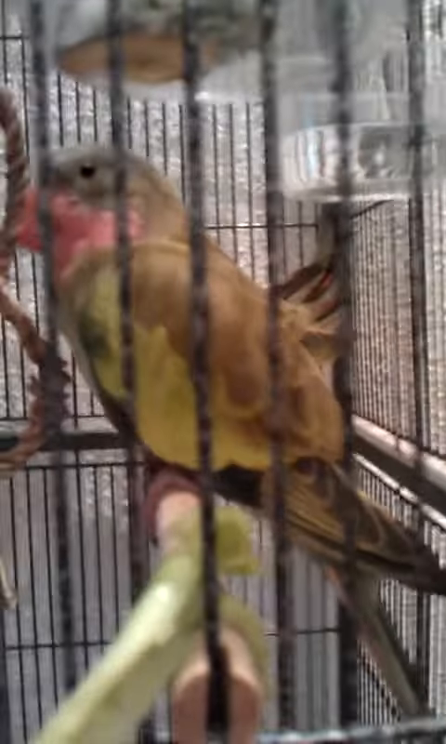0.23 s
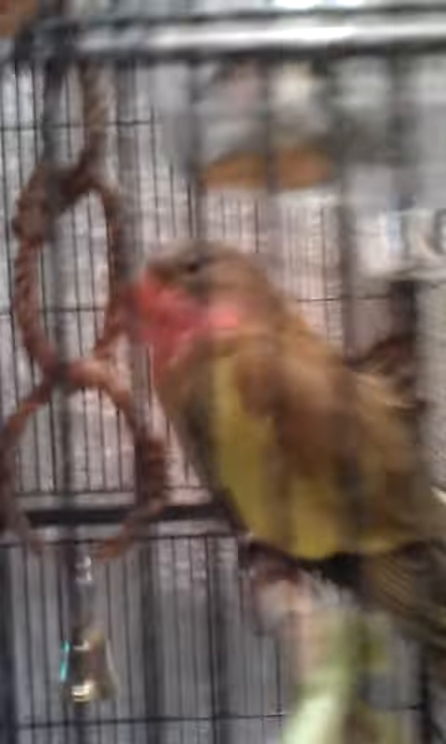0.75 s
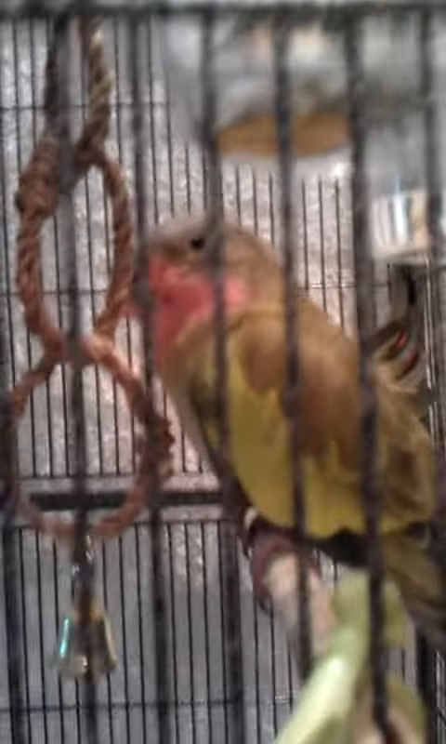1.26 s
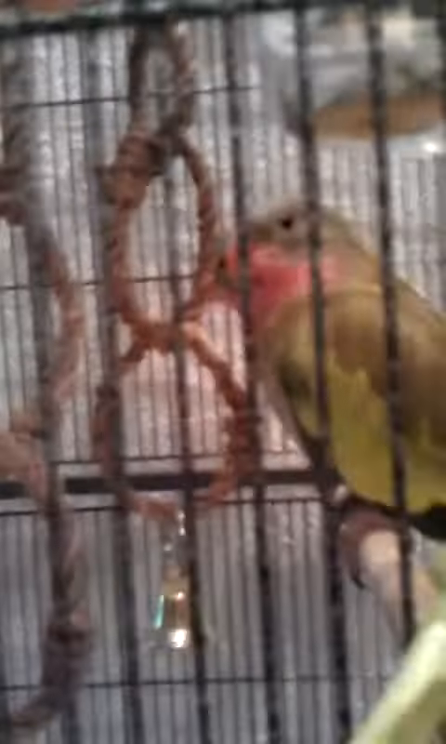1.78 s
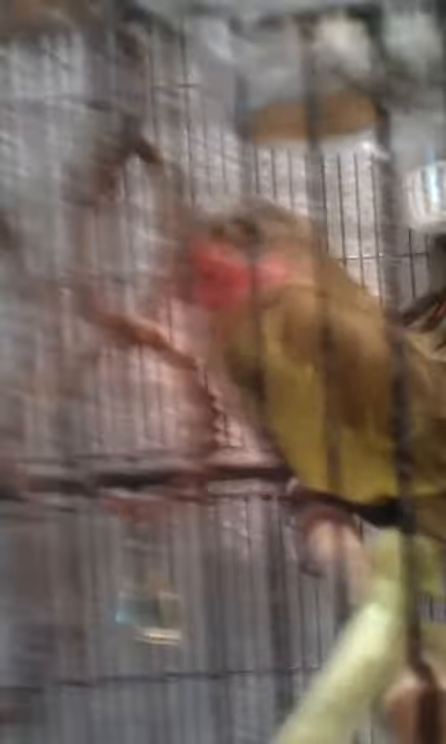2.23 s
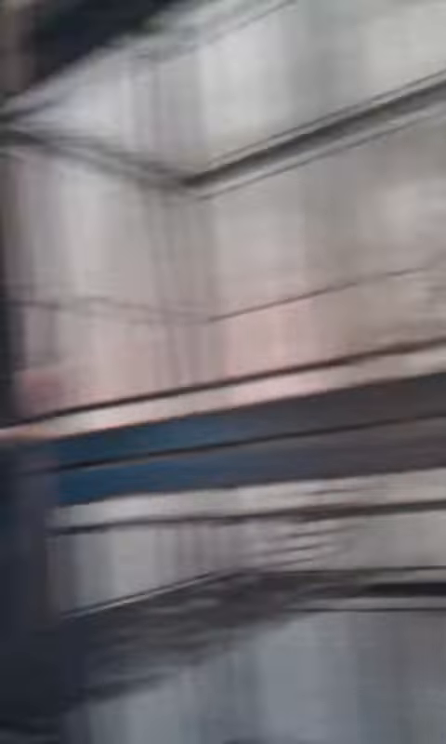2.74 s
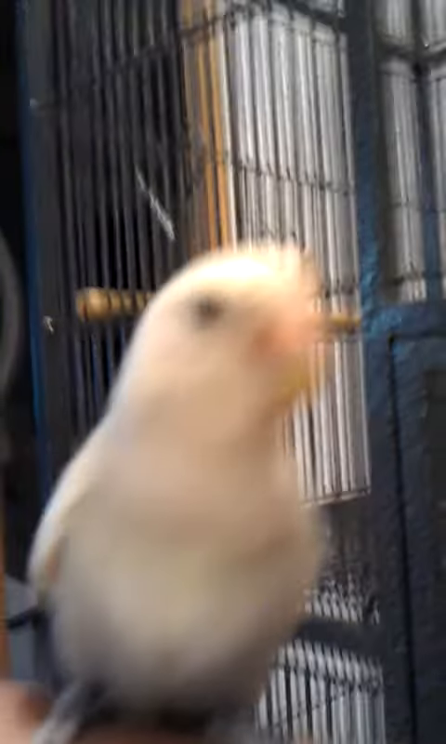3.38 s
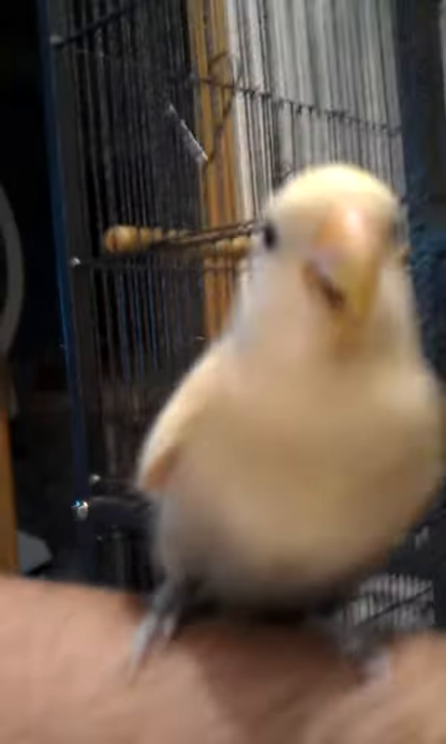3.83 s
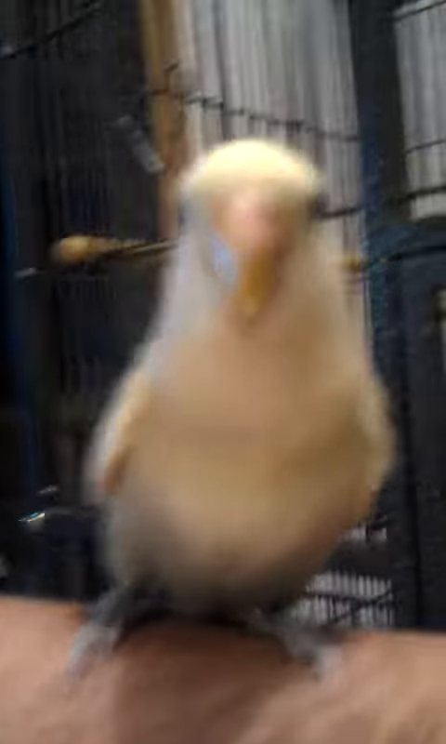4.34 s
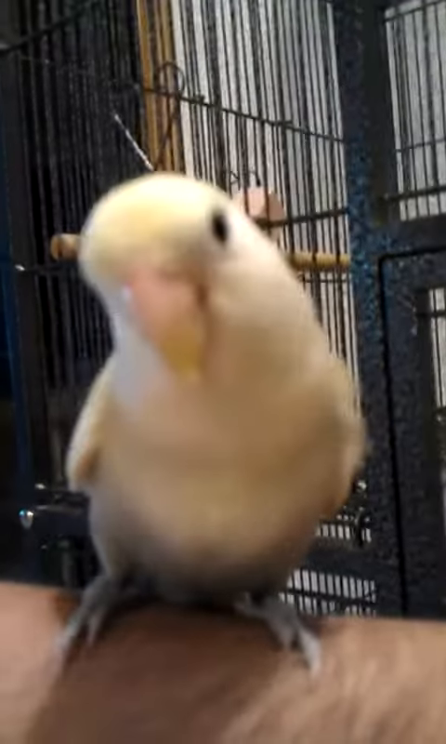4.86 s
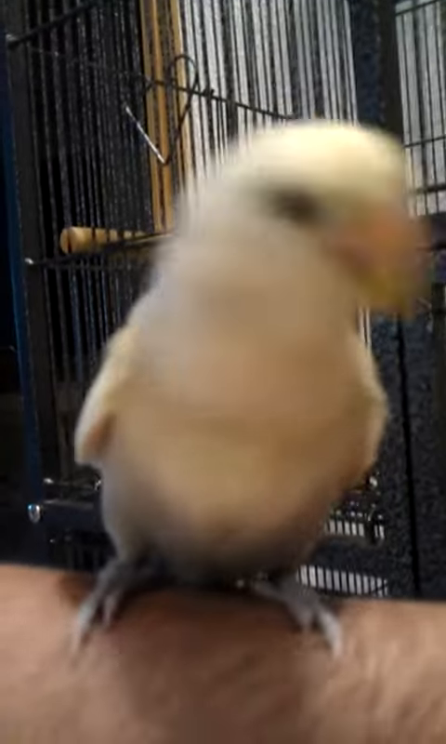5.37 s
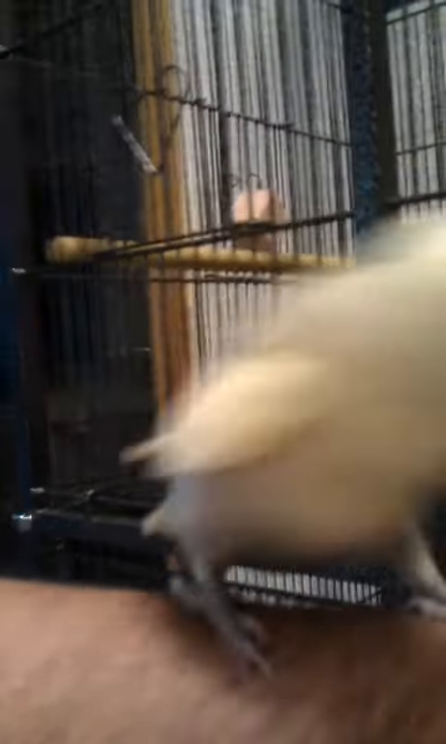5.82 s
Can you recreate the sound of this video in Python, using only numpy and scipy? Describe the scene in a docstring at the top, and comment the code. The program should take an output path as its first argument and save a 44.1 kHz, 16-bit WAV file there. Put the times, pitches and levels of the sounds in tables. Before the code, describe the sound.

Two loud, raspy lovebird screeches ring through a hard-walled room, with softer chirping and chatter from more distant birds.

```python
"""Lovebirds in a hard-walled room

One bird screeches twice right beside the microphone, which overloads while its gain control
clamps down and lets the room's ring swell up. Each screech is a run of joined notes, leaping
between a low and a high register and breaking into rasp. Other birds chirp and chatter farther
off, heard as reverberation over faint air noise and mains hum."""
import sys
import numpy as np
from scipy import signal
from scipy.fft import rfft, irfft, next_fast_len
from scipy.io import wavfile
from scipy.ndimage import uniform_filter1d

SR = 44100
rng = np.random.default_rng(int(sys.argv[2]) if len(sys.argv) > 2 else 0)


def wav_record(signal):
    """Record a signal, one row per channel, as 16-bit PCM in the file named by sys.argv[1]."""
    frames = np.transpose(np.atleast_2d(signal))
    bounded = np.clip(frames, -1, 1)
    # unit amplitude maps onto the largest positive 16-bit level
    quanta = np.round(bounded * 32767).astype(np.int16)
    wavfile.write(sys.argv[1], SR, quanta)


N = 269010
BAND_LIMIT_HZ = 15850

# The throat's resonances, as an EQ on the tone: frequency_hz, gain_db
THROAT_EQ = [(1200, -45.5), (1800, -13), (2100, -14.5), (2350, -18), (2650, -17), (2950, -18.5),
             (3250, -11.5), (3550, -28.5), (4050, -5), (4800, -6.5), (5400, -6.5), (6600, -1), (7150, -1),
             (7900, -32.5), (8550, -17.5), (9800, -16.5), (10600, -46), (12400, -30), (13500, -61.5)]
# The colour of the rasp: frequency_hz, gain_db
RASP_EQ = [(2300, -47.5), (2620, -15), (3300, -6.5), (4100, -3.5), (4800, -1.5), (6500, -1), (7800, -1),
           (9900, -11.5), (10600, -44)]
# The near bird's phrases, one list a screech, one row a note held until the next:
# start_s, opening_pitch_hz, held_pitch_hz, closing_pitch_hz, effort_db, roughness (0-1)
SCREECH_NOTES = [
    [(1.0300, 1952, 2134, 2359, 2.5, 0.18), (1.037, 2400, 2480, 2599, 5.5, 0.14),
     (1.0445, 3328, 3037, 2204, 3.5, 0.39), (1.049, 3094, 2840, 2573, 1, 0.42),
     (1.056, 2994, 3234, 3300, 6, 0.18), (1.0875, 4260, 4650, 5088, 9, 0.24),
     (1.092, 3294, 3565, 3436, 10, .12), (1.109, 2964, 3330, 3019, 5.5, 0.22),
     (1.1205, 4520, 4138, 3917, 8.5, 0.17), (1.137, 3816, 4000, 4114, 14, 0.08),
     (1.153, 4044, 4250, 4303, 9.5, .07), (1.174, 4240, 4400, 3950, 5, 0.13)],
    [(3.8245, 1689, 1792, 2134, -2.5, 0.06), (3.832, 2205, 3222, 3286, 5.5, 0.14),
     (3.868, 3259, 3380, 3882, 10.5, 0.13), (3.886, 5150, 5185, 4968, 13.5, .15),
     (3.897, 3503, 2653, 2616, -5, 0.47), (3.924, 2605, 3300, 3535, 6, 0.16),
     (3.9505, 4672, 4780, 4872, 15, 0.2), (3.962, 3380, 2714, 2793, -0.5, 0.22),
     (3.974, 2814, 2702, 2600, -1, 0.44)],
]
# Where each screech stops: end_s
SCREECH_ENDS_S = [1.201, 3.998]


def screech(notes, end_s):
    """The syrinx's harmonics ring through the throat; rough cycles lose their timing and turn to rasp."""
    t, pitch_hz, effort_db, roughness = screech_gesture(notes, end_s)
    jitter = 0.008 * wobble(len(t), rate_hz=300) + 0.12 * roughness * wobble(len(t), rate_hz=900)
    cycles = np.cumsum(pitch_hz * (1 + jitter)) / SR
    harmonics = sum(np.cos(2 * np.pi * k * cycles) * (k * pitch_hz < BAND_LIMIT_HZ) for k in range(1, 8))
    tone = coloured(harmonics, THROAT_EQ)
    rasp = coloured(rng.standard_normal(SR), RASP_EQ)[:len(t)]
    voice = np.sqrt(2 * (1 - roughness ** 2)) * tone + 5.4 * roughness ** 1.5 * rasp
    return t[0], gain_of(effort_db) * voice


def screech_gesture(notes, end_s):
    """The bird's phrasing: each note slides onto its pitch, holds it and flicks off into the next."""
    settle_s, flick_s, flutter_hz = 0.0055, 0.0028, 230.8
    onset_db, attack_s, release_db, release_s = -41.5, 0.0036, -14.5, 0.022
    start_s, opening_hz, held_hz, closing_hz, note_db, note_roughness = np.transpose(notes)
    t = np.arange(start_s[0], end_s, 1 / SR)
    note = np.searchsorted(start_s, t, "right") - 1
    since_s = t - start_s[note]
    until_s = np.append(start_s[1:], end_s)[note] - t
    slide_hz = (opening_hz - held_hz)[note] * np.exp(-since_s / settle_s)
    flick_hz = (closing_hz - held_hz)[note] * np.exp(-until_s / flick_s)
    roughness = np.clip(uniform_filter1d(note_roughness[note], size=90), 0, 1)
    flutter = 1 + 0.091 * roughness * np.sin(2 * np.pi * flutter_hz * t)
    pitch_hz = (held_hz[note] + slide_hz + flick_hz) * flutter
    swell_db = onset_db * np.exp((t[0] - t) / attack_s)
    sink_db = release_db * np.maximum(1 - (end_s - t) / release_s, 0)
    waver_db = -0.5 * wobble(len(t), rate_hz=93)
    effort_db = uniform_filter1d(note_db[note], size=180) + swell_db + sink_db + waver_db
    return t, pitch_hz, effort_db, roughness


# The far birds' chatter, one row a chirp: start_s, length_s, level_db (ahead of the reverb send),
# top_pitch_hz, droop (share of the pitch lost at both ends), roughness (0-1)
FAR_CHIRPS = [ (2.254, 0.088, -45.5, 3356, .24, 0.62), (2.301, 0.12, -41, 3820, .057, .22),
              (3.549, .061, -40, 3680, 0.089, 0.39), (3.593, 0.08, -36, 3432, .047, 0.21),
              (3.598, .044, -45, 2870, 0.21, 0.29), (4.265, 0.07, -23, 3293, 0.095, .21),
              (4.397, 0.1, -39, 2435, 0.19, 0.78), (4.494, .09, -26.5, 3358, 0.13, 0.35),
              (4.568, 0.057, -24, 3394, .071, 0.25), (4.672, 0.059, -48.5, 1353, .15, 0.63),
              (4.77, .11, -26, 3400, .2, 0.32), (4.878, 0.055, -24, 3247, 0.13, .14),
              (4.907, 0.12, -32, 2930, .24, 0.21), (5.081, .12, -31.5, 3437, .38, .45),
              (5.151, .14, -37.5, 2300, 0.23, .45), (5.186, .14, -39.5, 2950, 0.18, 0.63),
              (5.355, 0.056, -38, 1724, 0.15, 0.31), (5.461, .11, -25, 3195, 0.095, 0.31),
              (5.491, 0.073, -38, 2353, .2, 0.64), (5.565, 0.085, -37, 3080, 0.2, 0.18)]


def chirp(length_s, level_db, top_pitch_hz, droop, roughness):
    """A short arch of pitch that swells and fades, carried by the second harmonic, frayed by jitter."""
    arch = np.linspace(-1, 1, round(length_s * SR))
    jitter = 0.1706 * roughness * wobble(len(arch), rate_hz=682)
    pitch_hz = top_pitch_hz * (1 - droop * arch ** 2) * (1 + jitter)
    phase = 2 * np.pi * np.cumsum(pitch_hz) / SR
    tone = np.sin(2 * phase) + gain_of(-40.5) * np.sin(phase)
    shimmer = 1 + 0.83 * roughness * wobble(len(arch), rate_hz=570)  # uneven cycles widen the band
    swell = np.cos(np.pi * arch / 2)
    return gain_of(level_db) * unit_rms(tone * shimmer * swell)


# How long the hard walls ring, to 60 dB down: frequency_hz, decay_s
ROOM_DECAY = [(500, 0.27), (3000, 0.95), (4150, 0.93), (5200, 0.88), (6500, 0.82), (8500, 0.65),
              (10000, 0.35), (14000, 0.62)]


def room_reverb(x, build_s):
    """Dense reflections of random sign build up, then each band dies at its own speed."""
    size, reflections_per_s = 3 * SR // 2, 6000
    reflections = rng.choice([-1., 1.], size) * (rng.random(size) < reflections_per_s / SR)
    hz, t, bands = signal.stft(reflections, SR, nperseg=256)
    decay = gain_of(-60 * t / curve_at(ROOM_DECAY, hz)[:, None])
    build = 1 - np.exp(-t / build_s)
    tail = signal.istft(bands * decay * build, SR, nperseg=256)[1]
    return signal.fftconvolve(x, tail / np.linalg.norm(tail))[:N]


# The partials of the mains hum: pitch_hz, level_db
HUM_PARTIALS = [(50, -69.5), (100, -72), (200, -71.5)]
# The colour of the air noise: frequency_hz, gain_db
AIR_EQ = [(25, -2.5), (60, -7), (150, -7.5), (300, -8.5), (600, -12), (1000, -14.5), (2500, -18.5),
          (6500, -19), (9000, -25), (15500, -26.5)]


def room_tone():
    """A steady bed of mains hum and soft air noise."""
    t = np.arange(N) / SR
    hum = sum(gain_of(level_db) * np.sqrt(2) * np.sin(2 * np.pi * (pitch_hz * t + rng.random()))
              for pitch_hz, level_db in HUM_PARTIALS)
    air = gain_of(-61) * unit_rms(coloured(rng.standard_normal(N), AIR_EQ))
    return hum + air


def gain_of(db):
    """Decibels to an amplitude factor."""
    return 10 ** (np.asarray(db) / 20)


def unit_rms(x):
    """Scales to rms 1."""
    return x / np.sqrt(np.mean(x ** 2) + 1e-20)


def curve_at(points, hz):
    """Reads a table on a log-frequency axis."""
    points_hz, values = np.transpose(points)
    return np.interp(np.log(hz + 1), np.log(points_hz + 1), values)


def coloured(x, eq):
    """Filters by an EQ table of frequency_hz, gain_db."""
    size = next_fast_len(len(x) + 512)
    gain = gain_of(curve_at(eq, np.fft.rfftfreq(size, 1 / SR)))
    return irfft(rfft(x, size) * gain, size)[:len(x)]


def wobble(size, rate_hz):
    """Smooth random modulation of rms about 1, rolled off above the rate."""
    hz = np.fft.rfftfreq(SR, 1 / SR)
    spectrum = rfft(rng.standard_normal(SR)) / (1 + (hz / rate_hz) ** 4)
    return unit_rms(irfft(spectrum, SR))[:size]


def add(mix, start_s, sound):
    """Mixes a sound in at its start time."""
    part = mix[round(start_s * SR):][:len(sound)]
    part += sound[:len(part)]


def scene():
    """The near bird is mostly direct sound; the far ones arrive only by way of the walls."""
    near, far = np.zeros(N), np.zeros(N)
    for notes, end_s in zip(SCREECH_NOTES, SCREECH_ENDS_S):
        add(near, *screech(notes, end_s))
    for start_s, *shape in FAR_CHIRPS:
        add(far, start_s, chirp(*shape))
    near_ring = gain_of(-18) * room_reverb(near, build_s=0.010)
    far_ring = gain_of(-6) * room_reverb(far, build_s=0.021)
    return (near + near_ring + far_ring + room_tone())[None]


def overload(x, ceiling_db, bias):
    """The microphone stage saturates, a little lopsidedly; the offset that this builds up drains away."""
    ceiling = gain_of(ceiling_db)
    driven = signal.resample_poly(x, 3, 1) / ceiling + bias  # oversampled against aliasing
    saturated = driven / (1 + driven ** 4) ** (1 / 4) - bias
    clipped = ceiling * signal.resample_poly(saturated, 1, 3)
    offset = signal.sosfiltfilt(signal.butter(2, 70, fs=SR, output="sos"), clipped - x)
    return clipped - offset


def gain_control(x, limit_db, recovery_db_per_s, attack_s):
    """Ducks the level to the limit: part of the cut comes at once, the rest within milliseconds."""
    power_db = 10 * np.log10(abs(uniform_filter1d(x ** 2, size=200)) + 1e-12)
    recovery_db = np.arange(N) * recovery_db_per_s / SR
    held_db = np.maximum.accumulate(power_db + recovery_db) - recovery_db
    over_db = np.maximum(held_db - limit_db, 0)
    pole = np.exp(-1 / (attack_s * SR))
    lag_db = over_db - signal.lfilter([1 - pole], [1, -pole], over_db)
    return x * gain_of(0.55 * lag_db - over_db)


def record(dry):
    """The microphone chain: overload, gain control and a steep high cut."""
    x = overload(dry[0], ceiling_db=-6, bias=0.02)
    x = gain_control(x, limit_db=-17.5, recovery_db_per_s=226.5, attack_s=0.0061)
    high_cut = signal.firwin(511, BAND_LIMIT_HZ, window=("kaiser", 9), fs=SR)
    return signal.oaconvolve(x, high_cut, "same")[None]


dry = scene()
out = record(dry)
wav_record(out)
```